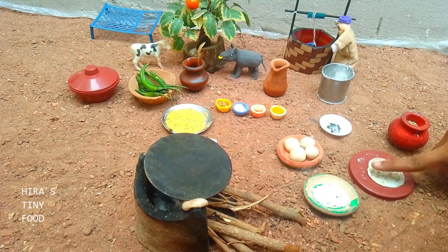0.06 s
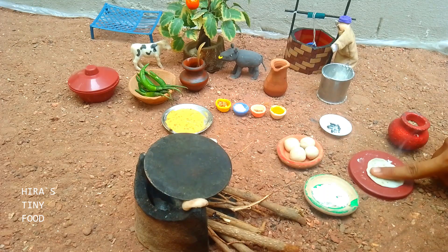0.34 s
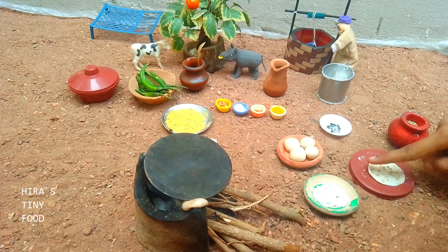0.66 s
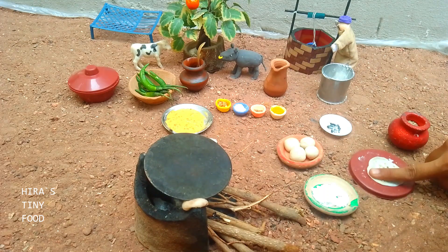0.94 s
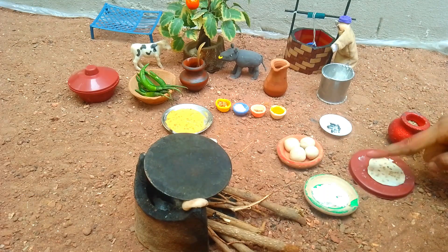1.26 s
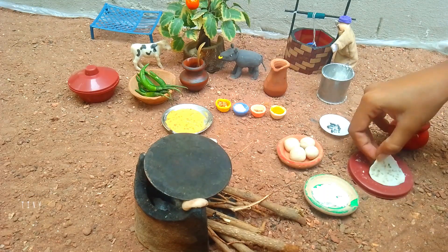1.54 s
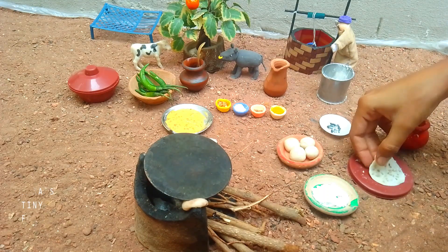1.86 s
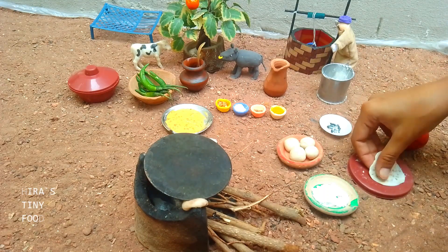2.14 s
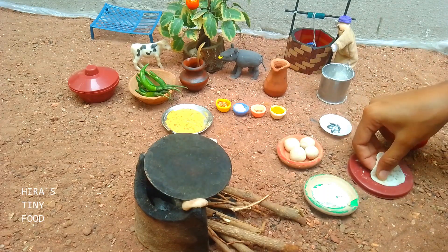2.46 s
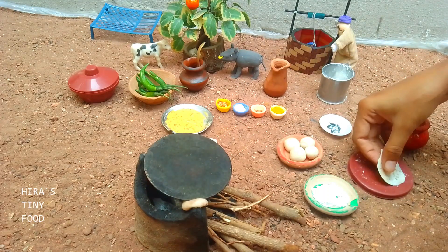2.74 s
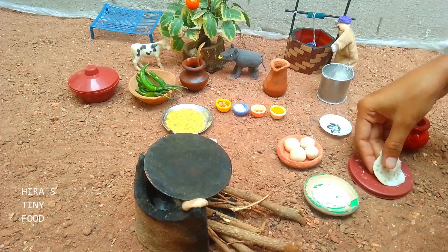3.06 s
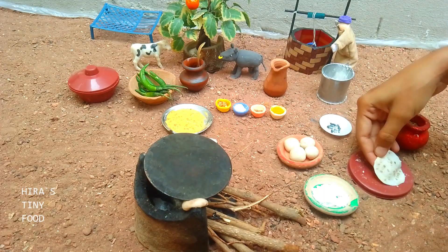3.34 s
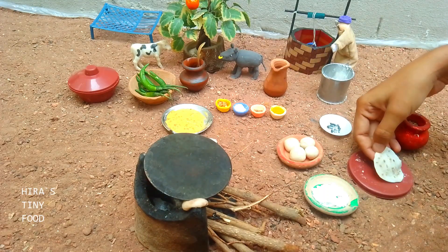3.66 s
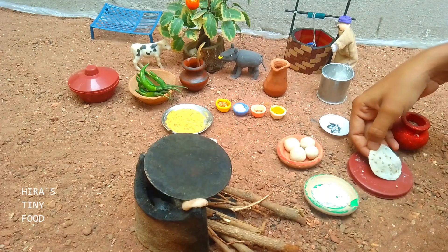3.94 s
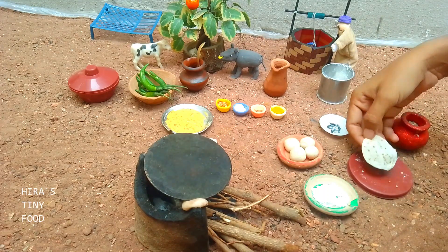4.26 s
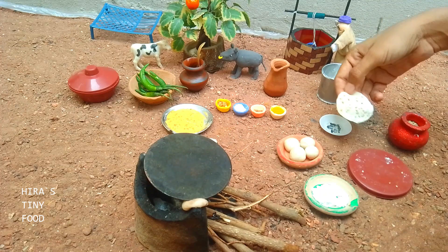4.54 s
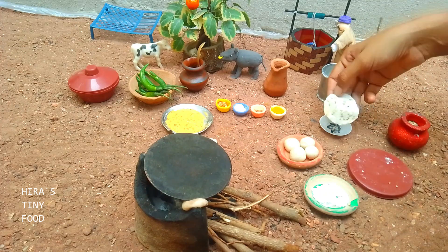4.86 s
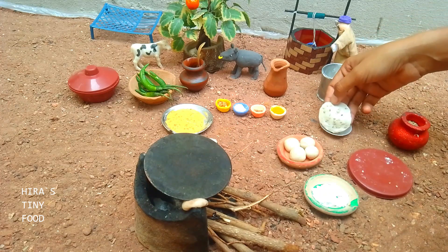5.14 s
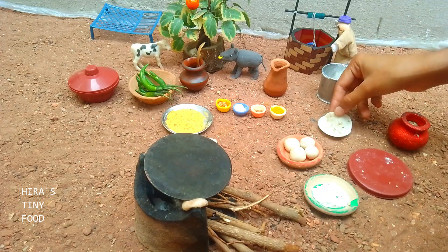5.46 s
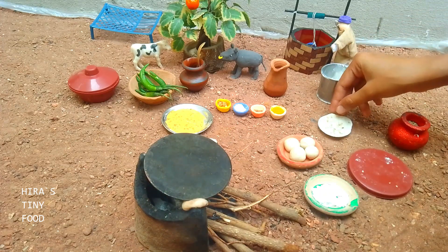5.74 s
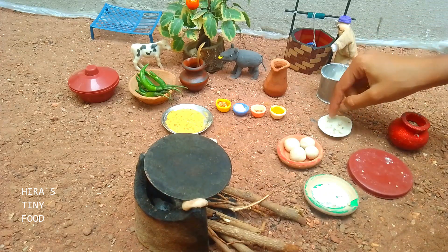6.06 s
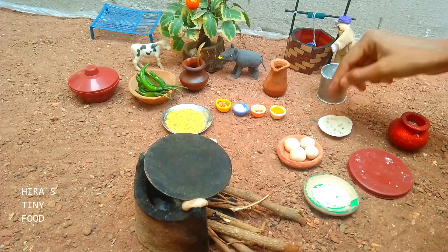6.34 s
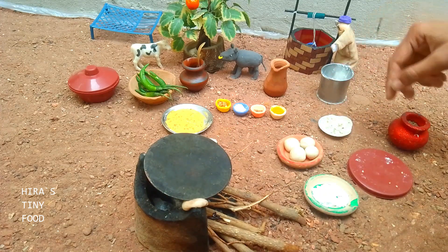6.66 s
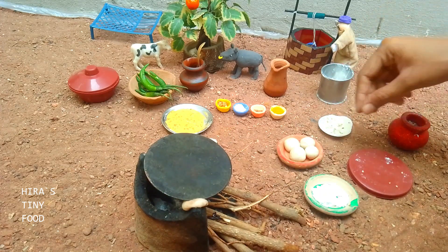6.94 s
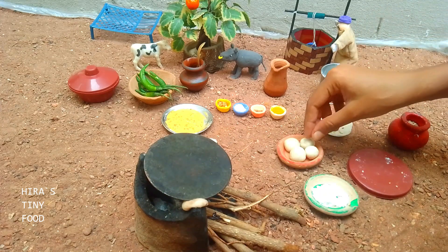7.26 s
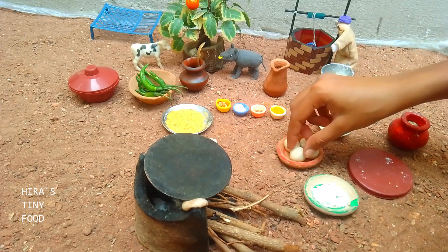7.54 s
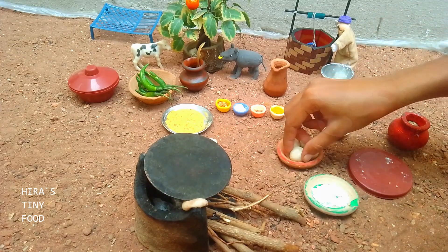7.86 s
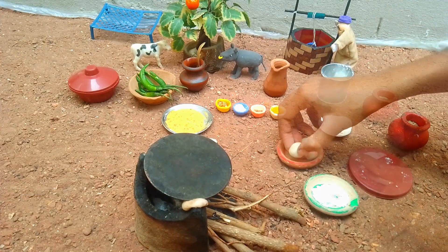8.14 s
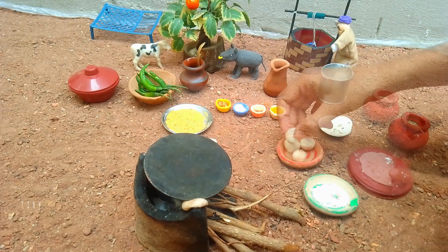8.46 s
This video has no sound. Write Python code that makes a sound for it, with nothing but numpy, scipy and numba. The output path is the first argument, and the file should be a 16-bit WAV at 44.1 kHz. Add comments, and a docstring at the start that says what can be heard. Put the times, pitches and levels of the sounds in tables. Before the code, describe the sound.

Distant birds twitter softly in an outdoor yard, then closer ones break in with clear falling whistles, nasal calls and sharp chips, each with a short echo. A harsh rasp turns into a rapid, hissy trill. Quieter calls follow, and a loud diving whistle comes at the end. Underneath, mostly in the first half, there are a few faint, dull dish bumps and a soft rustle of handling nearby.

```python
"""Birds call around a walled yard: slurred and swooping whistles, sharp chips, nasal mews, scratchy
chirps and a ticking trill, over a wash of twitter and open air. Whistles are nearly pure syrinx
tones; the reedy calls are harmonics shaped by throat and beak. A hand softly bumps small dishes on the
ground and peels dough off a plate. The walls echo every call, and a limiter flattens the loudest."""
import sys
import numpy as np
from scipy import signal
from scipy.fft import rfft, irfft
from scipy.io import wavfile
from scipy.ndimage import uniform_filter1d, minimum_filter1d
from numba import njit

SR = 44100
rng = np.random.default_rng(int(sys.argv[2]) if len(sys.argv) > 2 else 0)


def generate_wav(sig):
    """Save sig (samples, or channels by samples) to the path in sys.argv[1] as 16-bit PCM at SR."""
    pcm = np.round(np.clip(np.atleast_2d(sig).T, -1, 1) * 32767).astype(np.int16)
    wavfile.write(sys.argv[1], SR, pcm)


N = 379260
TIME = np.arange(N) / SR

# slap off the walls: delay/s, level/dB
WALL_ECHOES = [(.0062, -13.5), (0.0115, -8.5), (0.036, -12.5), (0.057, -16.5)]
# colour of the open air: f/Hz, level/dB
AIR_COLOUR = [(18, -76), (30, -35), (79, -16.5), (174, -8), (382, -21.5), (551, -10.5), (775, -24),
              (1060, -15.5), (1570, -2.5), (2520, -5.5), (3640, -8.5), (5690, -28.5), (7020, -13.5),
              (14600, -27), (15800, -15.5)]
# thin, far-off notes: t/s, length/s, start f/Hz, end f/Hz, level/dB
FAR_NOTES = [ (0.0, 0.048, 6120, 6210, -56), (0.099, 0.1, 5970, 5730, -67.5),
             (0.223, 0.03, 2670, 2514, -58), (0.34, 0.13, 3060, 2940, -57.5), (0.368, 0.2, 1677, 1591, -60),
             (0.692, .29, 2605, 1930, -59.5), (1.157, 0.19, 1700, 1770, -60.5),
             (2.593, 0.0794, 4514, 4290, -45.5), (2.721, .13, 4570, 4170, -54.5),
             (2.794, 0.071, 4270, 4183, -39), (4.037, .042, 1610, 1148, -30.5),
             (4.201, 0.038, 1444, 1136, -32), (5.667, 0.1, 2380, 2617, -51),
             (5.861, 0.0526, 2308, 2542, -41), (7.225, 0.052, 4420, 4180, -58.5),
             (7.391, 0.036, 2235, 2106, -52.5), (7.428, .14, 2538, 2833, -44.5),
             (7.474, 0.075, 3250, 3570, -57.5), (7.574, .12, 2984, 3233, -47),
             (7.67, 0.013, 5100, 4650, -62), (7.716, .07, 5050, 4090, -55), (7.968, 0.07, 3406, 3514, -54),
             (8.172, 0.057, 4690, 4070, -55.5), ]
# runs of one note, and a low note fluttering in the yard's echo:
# start t/s, end t/s, spacing/s, length/s, start f/Hz, end f/Hz, level/dB, fade/(dB/s)
FAR_REPEATS = [ (0.229, 0.72, .14, 0.067, 6380, 6226, -67, -12),
               (1.624, 1.9, 0.081, 0.055, 3150, 2145, -52.5, 10),
               (2.106, 2.48, 0.14, .054, 3850, 2385, -52, 65),
               (7.571, 7.72, 0.054, 0.041, 1700, 1870, -54.5, -26), ]
# level of the background wash of twitter and ringing echoes, swelling around the loud calls: t/s, level/dB
WASH_RIDE = [(0, -2.5), (1.4, 1.5), (2.2, 3), (2.55, -4), (3.2, 10.5), (6.4, -7.5), (7.1, -3), (8.6, -0.5)]
# soft rustle, swelling as the dough peels off the plate: t/s, level/dB
RUSTLE_RIDE = [(0, -74.5), (1.6, -76.5), (3.1, -64), (3.4, -71), (4.2, -61), (4.7, -73.5), (6.6, -81),
               (8.6, -74.5)]
# colour of the rustle: f/Hz, level/dB
RUSTLE_COLOUR = [(40, -40), (90, -4), (200, 4), (500, -2.5), (1000, -5), (3000, -4.5), (7000, -14),
                 (13000, -3.5), (16000, -18)]
# dishes bumping the ground: t/s, level/dB, 60 dB decay/s
DISH_BUMPS = [(1.717, -59.5, 0.72), (3.032, -57, 0.35), (3.081, -56, 0.23), (4.171, -46, 0.41)]
# dull body of a bump: f/Hz, level/dB
BUMP_COLOUR = [(40, -28), (65, -33), (95, -7.5), (160, 0.5), (300, -6), (600, -15.5), (1200, -16.5),
               (4000, -75)]
# harsh rasps of the trilling bird: t/s, length/s, f/Hz, level/dB
RASPS = [(0.0, 0.04, 3760, -68), (3.79, 0.013, 3300, -34.5), (3.813, 0.0073, 3340, -35),
         (4.463, 0.0078, 3680, -35.5), (5.385, 0.076, 3270, -31.5), (6.332, 0.016, 2860, -34.5)]
# ticks breaking out of the long rasp before the trill settles: t/s, level/dB
LEAD_IN_TICKS = [(5.446, -19.5), (5.48, -44)]
# throat and beak resonances of the trilling bird: f/Hz, level/dB
TRILL_VOICE = [(2800, -8), (3600, -22.5), (5200, 1), (6400, -1.5), (7500, 4), (8500, -18), (10300, -0.5),
               (12000, -22.5), (15000, -38)]
# hiss riding on that voice: f/Hz, level/dB
TRILL_HISS = [(1500, -26), (2600, -21), (3400, -2.5), (5000, 3), (5700, -15.5), (6600, 17), (8200, -6.5),
              (9200, 3.5), (10600, 0.5), (12700, -7), (15000, -31)]
# short, scratchy chirps: t/s, length/s, top f/Hz, level/dB
CHIRPS = [ (0.88, .038, 2760, -59.5), (1.0, 0.028, 2750, -55), (1.105, 0.039, 2730, -55.5),
          (1.925, 0.059, 2700, -59.5), (2.06, 0.049, 2976, -56), (2.615, 0.06, 2744, -47),
          (2.783, 0.071, 3047, -42), (2.95, 0.069, 3147, -41.5), (3.118, .071, 3130, -41),
          (3.3, 0.062, 3240, -40), (3.472, 0.063, 3215, -45), (4.872, 0.068, 2485, -47.5),
          (5.1, 0.049, 2780, -45), (8.39, .08, 2694, -51.5), ]
# resonances that colour a chirp: f/Hz, level/dB
CHIRP_VOICE = [(1400, 7), (2200, -6), (3100, 2), (3700, -4), (4700, 6.5), (6000, -12), (8000, -19.5),
               (14000, -37)]
# long, falling whistles: t/s, length/s, start f/Hz, end f/Hz, swell delay/s, level/dB
SLURS = [(3.082, 0.146, 2858, 1938, 0.062, -19.5), (3.479, 0.157, 2692, 1940, 0.044, -19.5)]
# whistles diving off a top note: start t/s, lowest t/s, end t/s, top f/Hz, bottom f/Hz, level/dB
SWOOPS = [(4.391, 4.427, 4.454, 4490, 2604, -17), (8.368, 8.542, 8.538, 3307, 2243, -17)]
# nasal calls that rise and fall: t/s, length/s, top f/Hz, level/dB
MEWS = [ (3.63, .13, 2076, -45.5), (3.885, .145, 2130, -45), (4.16, 0.15, 2130, -46.5),
        (4.495, .15, 2080, -52.5), (6.22, 0.098, 2200, -55), (6.455, .12, 2143, -49),
        (6.79, 0.12, 2223, -54.5), (7.15, .08, 1653, -67), (7.85, .075, 1680, -56.5),
        (8.07, 0.095, 1610, -60.5), (8.33, 0.084, 1600, -58), ]
# resonances that colour a mew: f/Hz, level/dB
MEW_VOICE = [(1300, -5), (2100, -5.5), (3200, -15.5), (4300, -4.5), (5200, 9), (6400, 2.5), (8200, -6),
             (10500, -18), (14000, -42)]
# close, steeply falling chips: t/s, length/s, level/dB
CHIPS = [(4.197, .015, -24), (4.645, 0.00797, -20.5), (4.706, 0.0098, -24), (4.896, .009, -19.5),
         (4.962, .009, -22), (5.169, 0.01016, -22.5), (5.233, 0.0097, -21)]


def undb(db):
    """Decibels to gain."""
    return 10 ** (np.asarray(db) / 20)


def unit(x):
    """Scale to rms 1."""
    return x / np.sqrt(np.mean(x ** 2))


def response(hz, points):
    """Gain at these frequencies of an EQ curve (f/Hz, level/dB)."""
    f, db = np.transpose(points)
    return undb(np.interp(np.log(np.maximum(hz, 1)), np.log(f), db))


def noise(colour):
    """Noise through an EQ curve, at rms 1."""
    hz = np.arange(N // 2 + 1) * SR / N
    return unit(irfft(rfft(rng.standard_normal(N)) * response(hz, colour), N))


def wander(t, rate):
    """Random values, rate a second, joined by lines."""
    return np.interp(t * rate, np.arange(4096), rng.standard_normal(4096))


def add(track, s, sound):
    """Mix a sound into the track at time s."""
    i = max(int(s * SR), 0)
    track[i:i + len(sound)] += sound[:max(N - i, 0)]


def span(length):
    """Time and progress 0-1 through a call."""
    t = np.arange(int(length * SR)) / SR
    return t, t / length


def swell(u, edge):
    """A call's envelope: rises and dies, squarer for a small edge."""
    return np.sin(np.pi * u) ** edge


def ease(x):
    """Smooth step from 0 to 1."""
    return np.sin(np.pi / 2 * np.clip(x, 0, 1)) ** 2


def decay(t, t60):
    """An envelope that falls 60 dB in t60 seconds."""
    return np.exp(-np.log(1000) * t / t60)


def whistle(hz, second_db, third_db):
    """A nearly pure syrinx tone with weak overtones."""
    phase = 2 * np.pi * np.cumsum(hz) / SR
    second = undb(second_db) * np.sin(2 * phase)
    third = undb(third_db) * np.sin(3 * phase) * (3 * hz < SR / 2)
    return np.sqrt(2) * (np.sin(phase) + second + third)


def reedy(hz, voice, overtones=1):
    """Eight harmonics gliding through the fixed resonances of throat and beak."""
    phase = 2 * np.pi * np.cumsum(hz) / SR
    partials = [response(k * hz, voice) * (k * hz < SR / 2) * np.sin(k * phase) for k in range(1, 9)]
    return partials[0] + overtones * sum(partials[1:])


def yard(x, tail_db, t60, early_db, early_t60, echo_db):
    """The reverb return: wall echoes, a quick scatter off the ground and a longer tail."""
    t = np.arange(SR) / SR
    grain = rng.standard_normal((4, SR))
    scatter = unit(grain[0] * grain[1] ** 2 * decay(t, early_t60) * (t > .002))
    tail = unit(grain[2] * grain[3] * decay(t, t60) * np.minimum(t / 0.02, 1))
    impulse = (undb(early_db) * scatter + undb(tail_db) * tail) / np.sqrt(SR)
    for s, db in WALL_ECHOES:
        add(impulse, s, undb([db + echo_db]))
    return signal.fftconvolve(x, impulse)[:N]


def open_air(db=-67):
    """A quiet noise bed whose level wavers slightly."""
    return undb(db + .5 * wander(TIME, 6.9)) * noise(AIR_COLOUR)


def repeated_notes(scatter_s=0.005, detune=0.0202):
    """The pulses of each run or echo flutter, each a little off in time and pitch."""
    notes = []
    for start, end, gap, length, start_hz, end_hz, db, fade in FAR_REPEATS:
        for s, (early, sharp) in zip(np.arange(start, end, gap), rng.standard_normal((8, 2))):
            tuning = 1 + detune * sharp
            level_db = db - fade * (s - start)
            notes.append((s - scatter_s * early, length, start_hz * tuning, end_hz * tuning, level_db))
    return notes


def far_notes(room_db=-64, send_slope=0.85):
    """Thin sliding notes; the fainter the bird, the more it is heard by reflection."""
    out, send = np.zeros((2, N))
    for s, length, start_hz, end_hz, db in FAR_NOTES + repeated_notes():
        t, u = span(length)
        glide = end_hz + (start_hz - end_hz) * (1 - u) ** 1.6  # slides fast, then settles
        pitch = glide * (1 + 0.014 * wander(t, 421))
        note = swell(u, 0.32) * whistle(pitch, second_db=-49, third_db=-35)
        direct = 1 / (1 + undb(-56 - db))
        add(out, s, undb(db) * direct * note)
        add(send, s, undb(room_db + send_slope * (db - room_db)) * note)
    return out + yard(send, tail_db=-4, t60=0.46, early_db=1.5, early_t60=0.16, echo_db=0.5)


def twitter_wash(db=-59.5, centre_hz=2258, count=190):
    """Little slurs blurred by the yard into twitter and ringing echoes, swelling around the loud calls."""
    send = np.zeros(N)
    t, u = span(0.03484)
    for k, (offset, height, slope, size) in enumerate(rng.uniform(-0.85, 1, (count, 4))):
        octaves = .48 * height + 0.583 * slope * (u - .5)
        tone = whistle(centre_hz * 2 ** octaves, second_db=-17.5, third_db=-46)
        add(send, (k + offset) * N / SR / count, undb(6.1 * size) * swell(u, 0.54) * tone)
    wash = yard(send, tail_db=5.5, t60=0.7, early_db=-9.5, early_t60=0.12, echo_db=-4.5)
    return undb(db + np.interp(TIME, *np.transpose(WASH_RIDE))) * unit(wash)


def dishes(attack_s=0.0083):
    """The rustle of handling and peeling dough, and dull bumps of dishes on the ground."""
    bumps = np.zeros(N)
    t, _ = span(.6)
    for s, db, t60 in DISH_BUMPS:
        add(bumps, s, undb(db) * decay(t, t60) * np.minimum(t / attack_s, 1))
    rustle_db = np.interp(TIME, *np.transpose(RUSTLE_RIDE)) + 1.5 * wander(TIME, 12)
    return bumps * noise(BUMP_COLOUR) + undb(rustle_db) * noise(RUSTLE_COLOUR)


def trill_ticks(middle_s=5.9035, gap_s=0.052, drag_s=0.014, db=-30, count=15):
    """Tick cues (t/s, level/dB): the lead-in, then an even beat that drags at both ends."""
    beat = np.arange(count) - (count - 1) / 2
    times = middle_s + gap_s * beat + drag_s * (beat / beat[-1]) ** 7
    return LEAD_IN_TICKS + list(zip(times, db + 0.6 * rng.standard_normal(count)))


def triller(tick_s=0.01068, start_hz=4136, end_hz=3090, tick_hiss_db=-2.5, rasp_hiss_db=-1):
    """Scattered rasps; the longest breaks into falling, hissy ticks with a strong second harmonic."""
    tone, hiss_envelope = np.zeros((2, N))
    for s, db in trill_ticks():
        t, u = span(tick_s)
        pitch = (start_hz + (end_hz - start_hz) * u ** 0.616) * (1 + 0.027 * wander(t, 1500))
        envelope = undb(db) * swell(u ** .6, 1.6)
        add(tone, s, envelope * reedy(pitch, TRILL_VOICE))
        add(hiss_envelope, s, envelope * undb(tick_hiss_db))
    for s, length, hz, db in RASPS:
        t, u = span(length)
        envelope = undb(db) * swell(u, 0.48) * (1 + 1.1 * wander(t, 1100))  # fast flutter adds grit
        pitch = hz * (1 + 0.0924 * wander(t, 2500))
        add(tone, s, envelope * reedy(pitch, TRILL_VOICE))
        add(hiss_envelope, s, envelope * undb(rasp_hiss_db))
    out = tone + hiss_envelope * noise(TRILL_HISS)
    return out + yard(out, tail_db=-6, t60=0.38, early_db=-2.5, early_t60=0.22, echo_db=-11)


def distant_trill(db=-55, start_s=.49, gap_s=.05, hz=3200, count=8):
    """A far bird repeats one small arched note."""
    out = np.zeros(N)
    t, u = span(0.0267)
    for k in range(count):
        pitch = hz * (.86 + 0.16 * np.sin(np.pi * u ** 1.23)) * (1 + 0.008 * wander(t, 89))
        note = swell(u, 0.73) * whistle(pitch, second_db=-22, third_db=-45)
        add(out, start_s + k * gap_s, undb(db) * note)
    return undb(-2.5) * out + yard(out, tail_db=-9, t60=0.57, early_db=-4.5, early_t60=0.076, echo_db=-6)


def arched_calls(calls, voice, edge_hz, skew, late, jitter, overtone_db, brightening, room_db, press=0):
    """Pitch arches up from edge_hz and back; pressed as it falls, the voice turns bright and rough."""
    out, send = np.zeros((2, N))
    for s, length, top_hz, db in calls:
        t, u = span(length)
        direct = 1 / (1 + undb(room_db - db))  # faint calls are wetter and rougher
        arch = edge_hz + (top_hz - edge_hz) * np.sin(np.pi * u ** skew)
        roughness = jitter * np.sqrt(1 - direct) * u ** 1.57 * wander(t, 2400)
        push_db = press * (db - room_db)  # press makes louder calls brighter
        overtones = undb(overtone_db + push_db) * (0.2 + u) ** brightening
        call = unit(swell(u ** late, 0.46) * reedy(arch * (1 + roughness), voice, overtones))
        add(out, s, undb(db) * direct * call)
        add(send, s, undb(db) * np.sqrt(1 - direct ** 2) * call)
    return out + yard(send, tail_db=-4, t60=.55, early_db=-1, early_t60=.15, echo_db=0)


def chirps():
    """Short arches that open pure and end in a scratch of overtones."""
    return arched_calls(CHIRPS, CHIRP_VOICE, edge_hz=1540, skew=.85, late=0.68, jitter=0.14,
                        overtone_db=-0.5, brightening=4.8, room_db=-49.5)


def slur(length, start_hz, end_hz, swell_at, db, lead_db=-23.5, swell_s=0.0074, release_s=0.033):
    """Pitch and envelope of a whistle that starts softly and swells, sinking at an even rate."""
    t, u = span(length)
    lead = undb(lead_db)
    effort = lead + (1 - lead) / (1 + np.exp((swell_at - t) / swell_s))
    fades = ease(t / 0.0092) * np.minimum((length - t) / release_s, 1)
    return start_hz * (end_hz / start_hz) ** u, undb(db) * effort * fades


def swoop(start, lowest, end, top_hz, bottom_hz, db, fall_s=0.05, rest_s=0.01106, top_db=-10.5):
    """Pitch and envelope of a whistle that grows, dives to full strength and, if it lasts, flicks up."""
    t = start + span(end - start)[0]
    falls_at = lowest - fall_s
    height = 1 - ease((t - falls_at) / fall_s)
    flick_hz = 24400 * np.maximum(t - lowest - rest_s, 0)
    pitch = bottom_hz + (top_hz - bottom_hz) * height + flick_hz
    attack_s = 0.001 + 0.38 * max(falls_at - start, 0)
    level_db = db + top_db * height - 116 * np.maximum(falls_at - t, 0)  # top note grows 116 dB/s
    return pitch, undb(level_db) * ease((t - start) / attack_s) * ease((end - t) / 0.0063)


def whistler():
    """The foreground whistles: long slurs and quick swoops, with a slight quaver."""
    out = np.zeros(N)
    calls = [(row[0], *slur(*row[1:])) for row in SLURS] + [(row[0], *swoop(*row)) for row in SWOOPS]
    for s, pitch, envelope in calls:
        quaver = 1 + 0.0068 * wander(TIME[:len(pitch)], 296.6)
        add(out, s, envelope * whistle(pitch * quaver, second_db=-62, third_db=-37))
    return out + yard(out, tail_db=-12, t60=.55, early_db=-12, early_t60=.25, echo_db=0)


def mews():
    """Longer, lower arches, nasal with overtones all the way through."""
    return arched_calls(MEWS, MEW_VOICE, edge_hz=1200, skew=.76, late=1.08, jitter=0.086,
                        overtone_db=-6.5, brightening=.25, room_db=-56, press=0.47)


def chipper(start_hz=2882, end_hz=1249):
    """Each chip hits hard, drops over an octave in milliseconds and sets the yard ringing."""
    out = np.zeros(N)
    for s, length, db in CHIPS:
        _, u = span(length)
        tone = whistle(start_hz * (end_hz / start_hz) ** u, second_db=-54, third_db=-38)
        add(out, s, undb(db) * swell(u ** .62, 1.6) * tone)
    return out + yard(out, tail_db=-1.5, t60=0.5, early_db=4, early_t60=0.22, echo_db=2.5)


def scene():
    """The mono mix: near and far birds, the dishes and the open air."""
    air = open_air()
    near = mews() + chirps() + whistler() + chipper() + triller()
    far = far_notes() + distant_trill() + twitter_wash()
    return (near + far + dishes() + air)[None]


@njit
def hold_peaks(size, release):
    """Peak follower: jumps up at once and sinks slowly."""
    out, held = np.empty(len(size)), 0.
    for i in range(len(size)):
        held = max(size[i], held * release)
        out[i] = held
    return out


def record(dry, threshold_db=-17.5, release_s=0.11, overload_db=-20, top_hz=15850):
    """A look-ahead limiter holds the peaks, soft overload adds odd overtones, and the top is cut."""
    peak = hold_peaks(np.abs(dry[0]), np.exp(-1 / (release_s * SR)))
    gain = np.minimum(1, undb(threshold_db) / (peak + 1e-9))
    gain = uniform_filter1d(minimum_filter1d(gain, size=65), size=65)  # ducks just ahead of a peak
    ceiling = undb(overload_db)
    saturated = ceiling * np.tanh(dry * gain / ceiling)
    return signal.sosfilt(signal.ellip(10, .2, 70, top_hz, fs=SR, output="sos"), saturated)


dry = scene()
out = record(dry)
generate_wav(out)
```